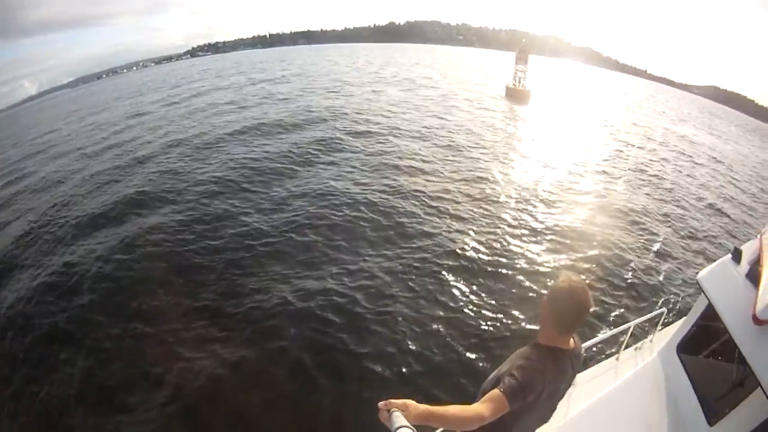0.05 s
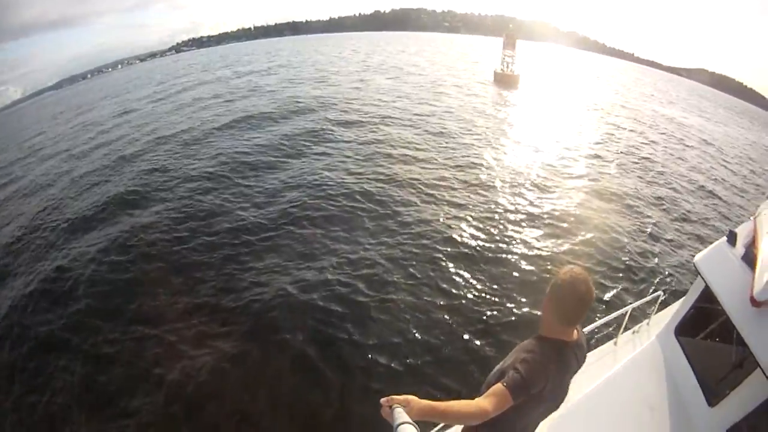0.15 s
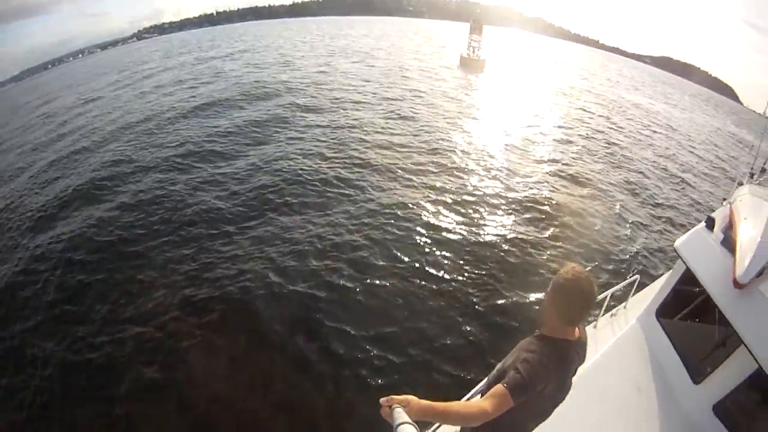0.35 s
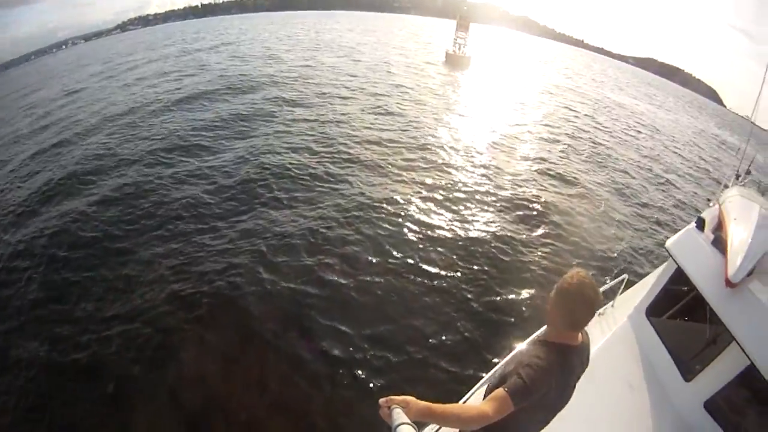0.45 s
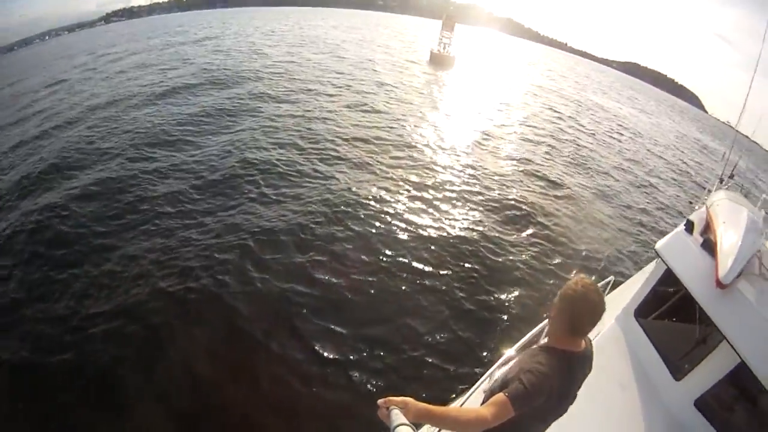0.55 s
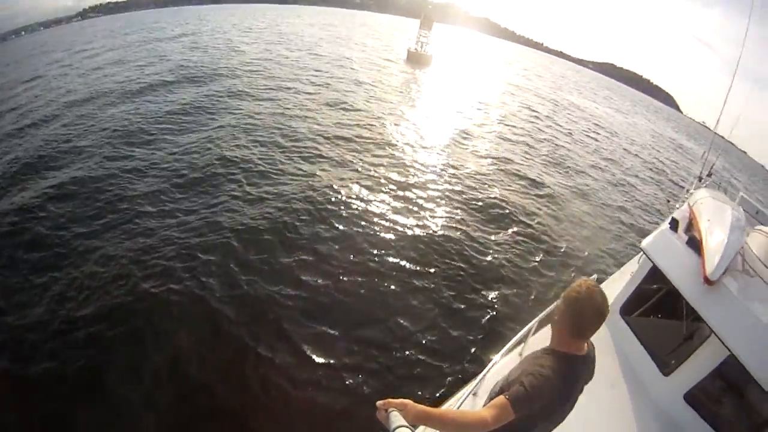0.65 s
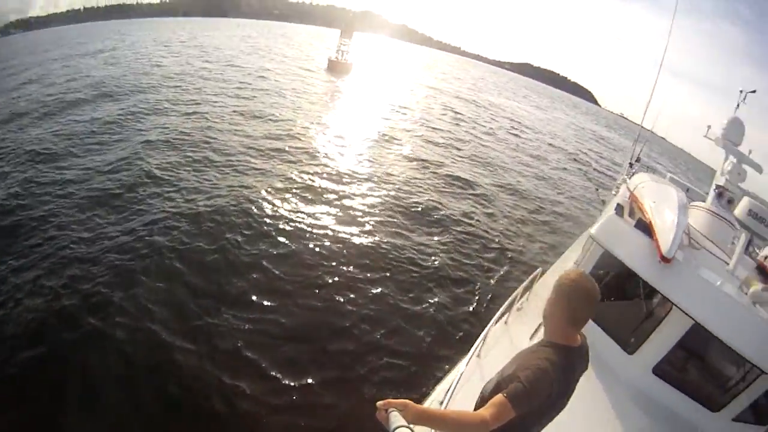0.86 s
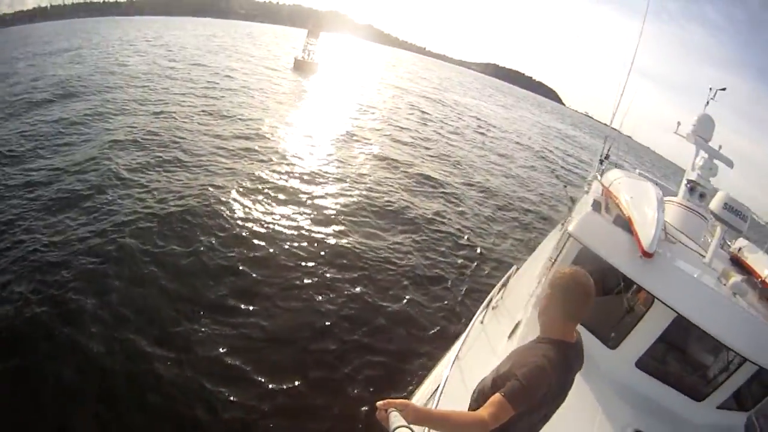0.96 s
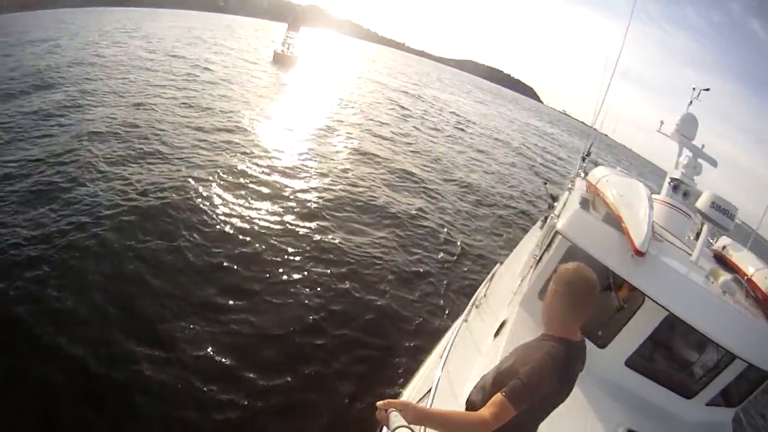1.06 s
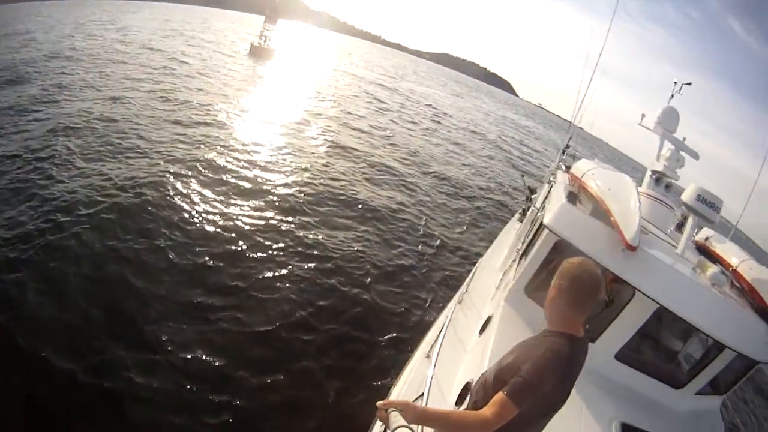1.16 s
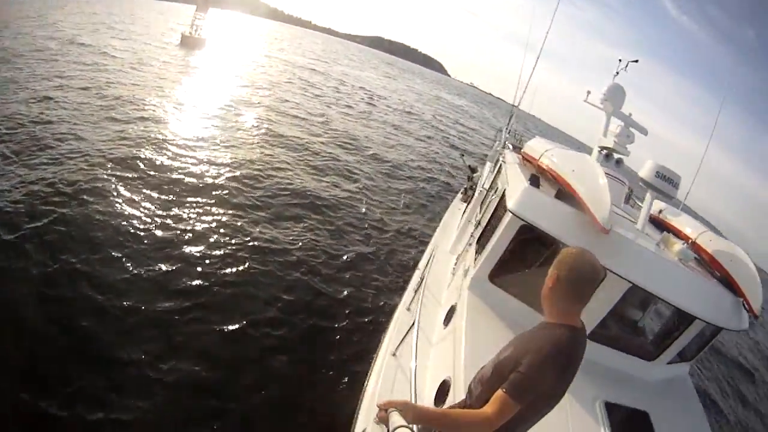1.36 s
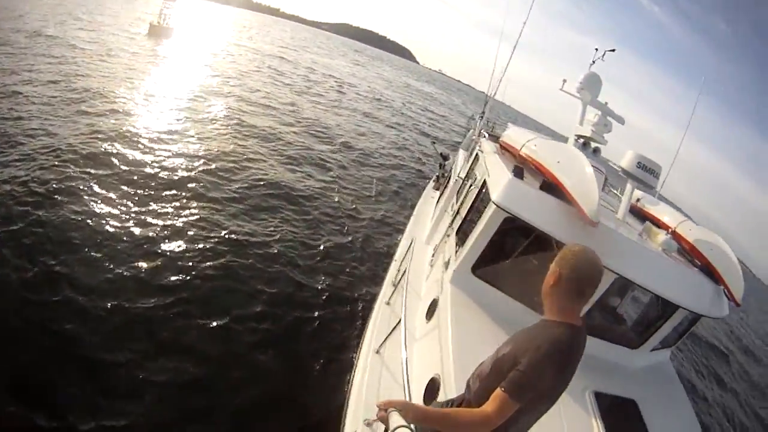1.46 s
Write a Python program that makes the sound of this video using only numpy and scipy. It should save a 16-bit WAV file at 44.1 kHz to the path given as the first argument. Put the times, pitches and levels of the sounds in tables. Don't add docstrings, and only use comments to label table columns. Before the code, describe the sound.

Buoy bell struck twice far off across water, preceded by hard plastic bumps and low thumps up close

```python
import sys
import numpy as np
from scipy import signal
from scipy.fft import rfft, irfft
from scipy.io import wavfile
from scipy.ndimage import uniform_filter1d

SR = 44100
rng = np.random.default_rng(int(sys.argv[2]) if len(sys.argv) > 2 else 0)


def log_audio(samples):
    frames = np.atleast_2d(samples).T
    limited = np.clip(frames, -1, 1)
    pcm = np.round(limited * 32767).astype(np.int16)
    wavfile.write(sys.argv[1], SR, pcm)


def undo_db(level):
    steps = np.asarray(level, float) / 20
    return 10 ** steps


N = 66150

PARTIAL_HZ = (593, 1000, 1352, 1855, 2292, 2675, 2923, 3056, 3252, 3370, 3892, 3930, 4522, 5373)
# first blow in dB, second blow in dB, T60 in seconds, swell in seconds.
PARTIALS = [(-55, -53, 2.48, 0.0076), (-57.5, -53, 3, 0.16), (-53, -55.5, 2.45, 0.0021),
            (-56.5, -79, 0.33, 0.0028), (-58.5, -63, 1.5, 0.05), (-54.5, -64, 0.49, 0.0019),
            (-46.5, -66, 0.92, 0.039), (-59.5, -65, 2.2, 0.012), (-59.5, -93, 0.295, .003),
            (-72, -66.5, 2.2, 0.014), (-53.5, -74, 0.8, 0.004), (-58, -74, 0.74, 0.004),
            (-69.5, -68.5, 2.5, 0.045), (-67, -86, 0.59, 0.0024)]
BLOW_S = [
    .859,
    1.06,
]
CLANK_LEVEL_DB = (-48, -66)
CLANK_CENTRE_HZ = (1600, 1190)
CLANK_BAND_HZ = (2600, 300)
# Hz, centre in seconds, length in seconds, gain in dB.
WAVE_PATH = [(1352, .887, 0.02, -2), (1352, 1.1, .01, -5), (3900, .86, 0.0051, -6), (1000, 1, 0.025, 5),
             (1000, 1.32, 0.027, 5.5), (1000, 0.94, 0.018, -5), (2292, 1.077, 0.069, 7.5),
             (2292, 1.3, .1, -3), (2923, .95, 0.041, 2), (2923, 0.888, .015, -5), (593, 1.15, 0.063, 1),
             (3100, 1.05, 0.05, 3), (1352, 1.23, .08, -4.5)]
# start in seconds, peak in dB, colour centre in Hz, T60 in seconds, top in Hz.
CASE_KNOCKS = [(.014, -45, 714, 0.037, 4030), (0.16, -39, 3040, .012, 9000),
               (.176, -37.5, 3100, 0.017, 4550), (0.2075, -12, 208, 0.021, 1100),
               (0.212, -3.5, 2090, .006, 19300), (0.2124, -3, 800, 0.018, 19000),
               (0.213, -15.5, 3900, 0.014, 19000), (0.2152, -22.5, 1800, 0.016, 19000),
               (0.2272, -21, 1480, 0.018, 6000), (0.2307, -20.5, 1990, .03, 5550),
               (0.2341, -25.5, 397, .1, 2500), (.279, -51, 1800, 0.02, 3000),
               (.303, -43.5, 1800, .015, 4200), (0.5501, -26, 950, 0.083, 3020),
               (0.5519, -37, 306, 0.049, 450), (0.5845, -22.5, 1150, .04, 3020),
               (0.5879, -25, 294, 0.035, 396), (0.6329, -25, 326, 0.07, 700),
               (0.658, -25, 1000, .055, 4030), (0.727, -38.5, 770, .015, 1510),
               (0.7871, -37.5, 4470, 0.011, 9000), (1.062, -47, 2500, 0.017, 4500)]
# frequency in Hz, level in dB, width in Hz.
CASE_MODES = [(198, 3, 98), (246, 5, 79), (340.5, 0.5, 65), (439.4, -7.5, 26.5), (571, -4.5, 84),
              (847, -3.5, 170), (1038, -2, 110), (1460, -13, 230), (1850, -1.5, 128), (2109, 3, 164),
              (2440, -26, 280), (3790, -7, 160), (5220, -3.5, 1000)]
# start in seconds, peak in dB, frequency in Hz, fade in seconds.
POLE_THUMPS = [
    (0.2086, -9, 69, 0.0091),
    (0.2417, -15, 67.6, .011),
    (0.583, -31.5, 92, 0.004),
    (0.5976, -19.5, 80, 0.0052),
    (0.6327, -10, 59.7, 0.01),
    (0.658, -25, 58.6, 0.018),
]
# start in seconds, length in seconds, level in dB, centre in Hz, width in Hz.
HAND_RUBS = [(0.171, 0.076, -45.5, 1500, 2700), (0.199, 0.018, -32.5, 2200, 550),
             (0.227, 0.02, -41, 600, 800), (0.473, 0.048, -59, 2000, 3100), (0.553, 0.039, -43, 1800, 2200),
             (0.591, 0.02, -47, 1800, 1900), (0.627, 0.02, -46, 1500, 1700), (0.74, .03, -57.5, 2000, 1100),
             (0.332, 0.25, -66, 936, 20), (0.025, 0.087, -65.5, 2340, 130), (0.173, 0.034, -52, 385, 42)]
# centre in seconds, peak in dB, Hz, length in seconds,
# pitch rise as a share.
TICKS = [(0.16, -49, 2380, .006, 0.071), (0.215, -31.5, 3846, 0.0063, 0.058),
         (0.246, -36.5, 470, .02, 0.032), (0.3042, -44, 1744, 0.0066, 0.08),
         (0.304, -54.5, 3660, .006, .01), (.351, -57, 3980, 0.0087, 0.052), (0.37, -60, 4700, .005, .03),
         (.421, -57, 3900, 0.0075, 0.069), (.477, -61, 4960, 0.007, .03), (.478, -67, 3040, .006, 0.031),
         (0.49, -54, 2190, 0.0062, .15), (0.502, -57, 3970, .008, .06), (.522, -58, 3620, .007, 0.077),
         (0.525, -58, 4570, .005, .05), (0.537, -58, 3970, .007, 0.07), (.554, -33, 330, .016, -0.017),
         (.556, -39.5, 822, .014, 0.025), (0.5527, -42, 1004, .008, -0.0072),
         (.553, -42, 1750, .007, 0.042), (.637, -36, 724, 0.01208, 0.06), (.663, -41.5, 497, 0.0116, -.1),
         (0.579, -60.5, 4890, 0.036, .005), (0.588, -43, 1926, .008, .01), (.591, -44, 2270, .008, .01),
         (0.611, -57, 3480, 0.0042, 0.004), (.635, -26, 278, 0.0071, -.2), (.636, -49, 1850, 0.011, -0.043),
         (0.637, -54, 3360, 0.0094, .01), (0.66, -46.5, 1100, 0.00964, 0.058),
         (.66, -52, 3500, 0.0071, .01), (.661, -42, 2510, .007, -0.086), (.789, -50.5, 3780, .006, 0.0037),
         (0.863, -49, 1290, .008, 0.12), (.874, -51, 1240, .008, .15), (.861, -48, 3110, 0.0054, .05),
         (0.873, -57, 3040, 0.0052, .05), (1.064, -49, 1190, 0.012, -0.017)]
# time in seconds, slow sway in dB, quick bend in dB.
GUSTS = [(0, -44.5, -42.5), (.13, -54, -49.5), (.3, -41.5, -44), (.37, -38.5, -40.5), (0.408, -59, -44),
         (0.459, -51, -40.5), (.51, -43.5, -44.5), (.7, -40.5, -44), (0.782, -29.5, -43), (.87, -44, -54),
         (.98, -44.5, -42), (1.08, -48, -49), (1.13, -39, -52.5), (1.17, -46, -46.5), (1.25, -33, -49),
         (1.311, -42, -44.5), (1.37, -38.5, -46.5), (1.5, -46.5, -44)]
# frequency in Hz, level in dB.
RUMBLE_SPECTRUM = [(20, 0.5), (60, -18), (120, -15), (200, -3.5), (300, -38), (500, -30)]
# frequency in Hz, density in dB per Hz.
WATER_SPECTRUM = [(120, -34), (200, -7.5), (430, -7.5), (595, -10), (695, -6.5), (991, -7.5), (1800, -12),
                  (2990, -14), (5900, -26.5), (7670, -69), (13000, -120)]
# frequency in Hz, level in dB.
SIDE_SPECTRUM = [(29, -70), (50, -33), (1450, -17), (1970, -16), (2960, -16), (4770, -14), (5910, -27),
                 (7160, -17.5), (15000, -43)]
# frequency in Hz, level in dB.
SIDE_LEAK = [(30, -38), (70, -40), (150, -29), (300, -33), (700, -38), (1500, -42), (3000, -37),
             (8000, -46)]
# start in seconds, end in seconds.
DROPOUTS = [(.35, .392), (.435, .48), (.8, .855)]


def evened(x):
    return x / np.sqrt(np.mean(x ** 2) + 1e-20)


def read(points, hz):
    f, value = np.transpose(points)
    return np.interp(np.log(hz + 1), np.log(f + 1), value)


def add(mix, start_s, sound):
    part = mix[round(start_s * SR):][:len(sound)]
    part += sound[:len(part)]


def resonate(x, hz, width_hz):
    turn = np.exp(2j * np.pi * np.cumsum(hz * np.ones(len(x))) / SR)
    r = np.exp(-np.pi * width_hz / SR)
    return 2 * (turn * signal.lfilter([1 - r], [1, -r], x / turn + 1e-18)).real


def resonate_twice(x, hz, width_hz):
    return resonate(resonate(x, hz, width_hz), hz, width_hz)


def shaped(x, points):
    return irfft(rfft(x) * undo_db(read(points, np.fft.rfftfreq(len(x), 1 / SR))), len(x))


def dulled(x, top_hz):
    return signal.sosfilt(signal.butter(4, min(top_hz, SR / 2.2), fs=SR, output="sos"), x)


def drift(top_hz):
    t = np.arange(N) / SR
    rates_hz = np.geomspace(.15, 1, num=10) * top_hz
    return evened(sum(np.sin(2 * np.pi * (hz * t + rng.random())) for hz in rates_hz))


def ring_power(t, start_s, db, t60_s, swell_s):
    swell = 1 - np.exp(-np.maximum(t - start_s, 0) / swell_s)
    return (undo_db(db - 60 * (t - start_s) / t60_s) * swell) ** 2


def wave_path_db(t, hz):
    width_hz = 90
    return sum(db * np.exp(-((hz - f) / width_hz) ** 2 - ((t - s) / length_s) ** 2)
               for f, s, length_s, db in WAVE_PATH)


def bell():
    hum_s, hum_db, hum_swell_s = 0.44, -54, 0.075
    pair_hz, pair_null_s = (3892, 3930), .889
    waver_db, waver_hz = 1, 11.81
    clank_t60_s, clank_rise_s = 0.11, 0.00078
    shade_s, shade_db, shade_length_s = 1.07, -2, 0.068
    t, out = np.arange(N) / SR, np.zeros(N)
    for k, (hz, (first_db, second_db, t60_s, swell_s)) in enumerate(zip(PARTIAL_HZ, PARTIALS)):
        power = ring_power(t, BLOW_S[0], first_db, t60_s, swell_s)
        power = power + ring_power(t, BLOW_S[1], second_db, t60_s, swell_s)
        if k == 0:
            power = power + ring_power(t, hum_s, hum_db, t60_s, hum_swell_s)
        if hz == pair_hz[1]:
            phase = phase + .5 - (hz - pair_hz[0]) * pair_null_s
        else:
            phase = rng.random()
        path = undo_db(wave_path_db(t, hz) + waver_db * drift(waver_hz))
        out += np.sqrt(power) * path * np.sin(2 * np.pi * (hz * t + phase))
    u = t[:4000]
    for s, db, hz, width_hz in zip(BLOW_S, CLANK_LEVEL_DB, CLANK_CENTRE_HZ, CLANK_BAND_HZ):
        noise = evened(resonate_twice(rng.standard_normal(len(u)), hz, width_hz))
        add(out, s, undo_db(db - 60 * u / clank_t60_s) * np.minimum(u / clank_rise_s, 1) * noise)
    return out * undo_db(shade_db * np.clip((t - shade_s) / shade_length_s, 0, 1))


def knocks():
    rise_s, snap_s, snap = .001, .0001, 9
    colour_db, colour_width, dry_db = 5, 0.88, -28
    t, out = np.arange(3000) / SR, np.zeros(N)
    for s, db, hz, t60_s, top_hz in CASE_KNOCKS:
        rattle = np.minimum(t / rise_s, 1) * rng.standard_normal(len(t))
        burst = undo_db(-60 * t / t60_s) * (rattle - snap * (t < snap_s))
        x = sum(undo_db(mode_db - colour_db * np.log2(f / hz) ** 2) * resonate(burst, f, w) * 200 / w
                for f, mode_db, w in CASE_MODES)
        x = resonate(x, hz, colour_width * hz) + undo_db(dry_db + 2.7 * np.log2(hz / 1000)) * burst
        x = dulled(x, top_hz)
        add(out, s, undo_db(db) * x / abs(x).max())
    return out


def thumps():
    sag, sag_s, rise_s = 1.5, .003, .005
    t, out = np.arange(5000) / SR, np.zeros(N)
    for s, db, hz, fade_s in POLE_THUMPS:
        turns = np.cumsum(hz * (1 + sag * np.exp(-t / sag_s))) / SR
        x = -np.sin(2 * np.pi * turns) * (1 - np.exp(-t / rise_s)) * np.exp(-t / fade_s)
        add(out, s, undo_db(db) * x / abs(x).max())
    return out


def rubs():
    grain_db, top_hz = 2.2, 4170
    out = np.zeros(N)
    for s, length_s, db, hz, width_hz in HAND_RUBS:
        noise, grain = rng.standard_normal((2, int(length_s * SR)))
        x = dulled(resonate_twice(noise * undo_db(grain_db * grain), hz, width_hz), top_hz)
        stroke = np.sin(np.pi * np.linspace(0, 1, len(x))) ** 1.1
        add(out, s, undo_db(db) * evened(x) * stroke)
    return out


def pings():
    out = np.zeros(N)
    for s, db, hz, length_s, rise in TICKS:
        u = np.arange(0, 2, 1 / (length_s * SR))
        turns = np.cumsum(hz * (1 + rise * (u - .5))) / SR
        envelope = (u / 0.41 * np.exp(1 - u / 0.38)) ** 2
        add(out, s - length_s / 2, undo_db(db) * envelope * np.sin(2 * np.pi * turns))
    return out


def pole_mode(noise, hz, width_hz):
    steady = 0.76
    x = evened(resonate(resonate(noise, hz, width_hz), hz, 1.14 * width_hz))
    power = abs(uniform_filter1d(x ** 2, size=1200))
    return evened(x / (power + 0.043) ** (steady / 2))


def wind():
    lump_db, lump_hz, rumble_db = 0.28, 7.88, -16
    t = np.arange(N) / SR
    gust_s, sway_points, bend_points = np.transpose(GUSTS)
    sway_db, bend_db = np.interp(t, gust_s, sway_points), np.interp(t, gust_s, bend_points)
    sway_noise, rumble_noise, bend_noise = rng.standard_normal(size=(3, N))
    sway = pole_mode(sway_noise, 36.35, 14.3)
    bend = pole_mode(bend_noise, 80, 25.5)
    bend = bend + undo_db(rumble_db) * evened(shaped(rumble_noise, RUMBLE_SPECTRUM))
    return undo_db(lump_db * drift(lump_hz)) * (undo_db(sway_db) * sway + undo_db(bend_db) * bend)


def water():
    level_db, rise_db, patch_db, flicker_db = -61, 1.5, .9, .9
    frames, hz = N // 128 + 5, np.fft.rfftfreq(512, 1 / SR)
    real, imag, patch = rng.standard_normal((frames, 257, 3)).T
    patch = uniform_filter1d(uniform_filter1d(patch, size=5, axis=0), size=16, axis=1)
    flicker = evened(uniform_filter1d(rng.standard_normal(frames), size=3))
    spectrum_db = (read(WATER_SPECTRUM, hz) - 80 * (hz < 180))[:, None]
    cells_db = spectrum_db + patch_db * evened(patch) + flicker_db * flicker
    z = (real + 1j * imag) * undo_db(cells_db)
    hiss = evened(signal.istft(z, nperseg=512, noverlap=384)[1][:N])
    toward_hull = np.clip((np.arange(N) / SR - .4) / 0.09, 0, 1)
    return hiss * undo_db(level_db + rise_db * toward_hull)


def scene():
    return np.tile(bell() + knocks() + thumps() + rubs() + pings() + wind() + water(), (2, 1))


def sample_and_hold(x):
    clock_hz, edge_hz = 12000, 15250
    hz = np.fft.rfftfreq(N, 1 / SR)
    low = irfft(rfft(x) / (1 + (hz / 5800) ** 30), N)
    sampled = low * (1 + 2 * np.cos(2 * np.pi * clock_hz * np.arange(N) / SR))
    edge = undo_db(-18 * (hz > edge_hz) - 60 * (hz > 16030))
    return irfft(rfft(sampled) * np.sinc(hz / clock_hz) * edge, N)


def patchy_top_band(x):
    edge_hz, dropout_hz, hole_share, gate_db = 15250, 12600, .55, -84
    hz, t, z = signal.stft(x, SR, nperseg=512)
    holes = rng.random((len(t) // 2 + 1, 52)) < hole_share
    holes = np.repeat(np.repeat(holes, 2, axis=0), 5, axis=1).T[:len(hz), :len(t)]
    active = sum((t > start_s) & (t < end_s) for start_s, end_s in DROPOUTS)
    top = hz > edge_hz
    quiet = np.sqrt((abs(z[top & (hz < 16000)]) ** 2).mean(0)) < undo_db(gate_db)
    gone = holes * active * (hz > dropout_hz)[:, None] + top[:, None] * quiet
    return signal.istft(z * np.where(gone, .05, 1), SR, nperseg=512)[1][:N]


def top_cut(x):
    return signal.sosfilt(signal.butter(12, 16020, fs=SR, output="sos"), x)


def record(dry):
    side_db = -80.5
    held = patchy_top_band(sample_and_hold(dry[0]))
    hiss = undo_db(side_db) * evened(shaped(rng.standard_normal(N), SIDE_SPECTRUM))
    side = hiss + np.roll(shaped(held, SIDE_LEAK), SR // 300)
    return top_cut(np.array([held + side, held - side]))


dry = scene()
out = record(dry)
log_audio(out)
```